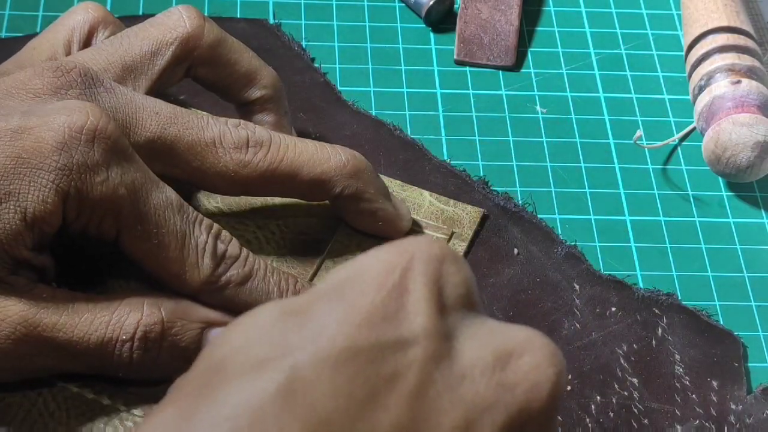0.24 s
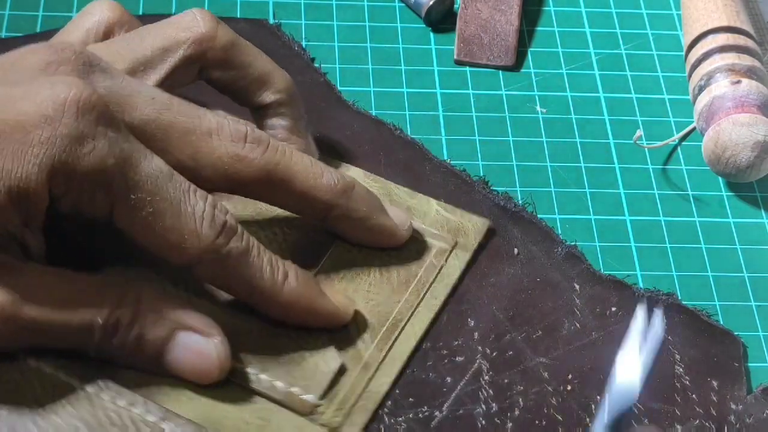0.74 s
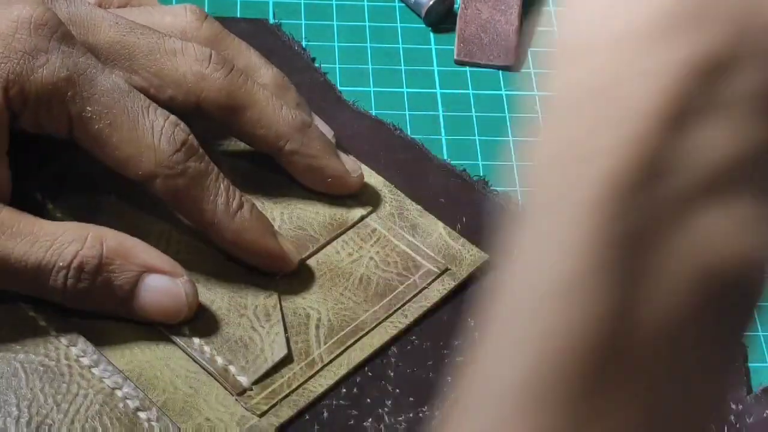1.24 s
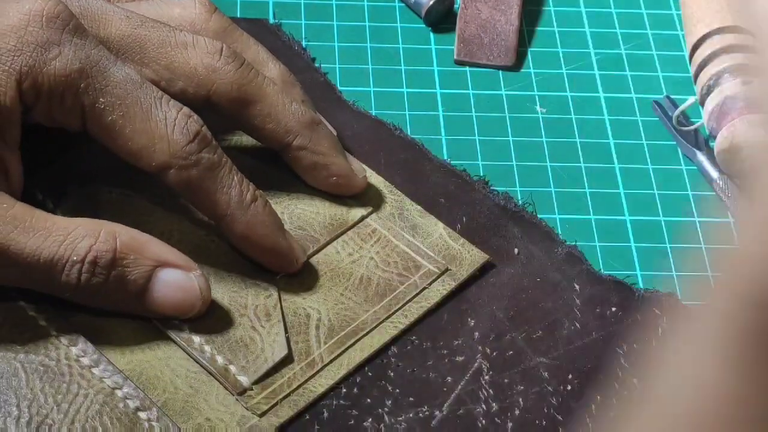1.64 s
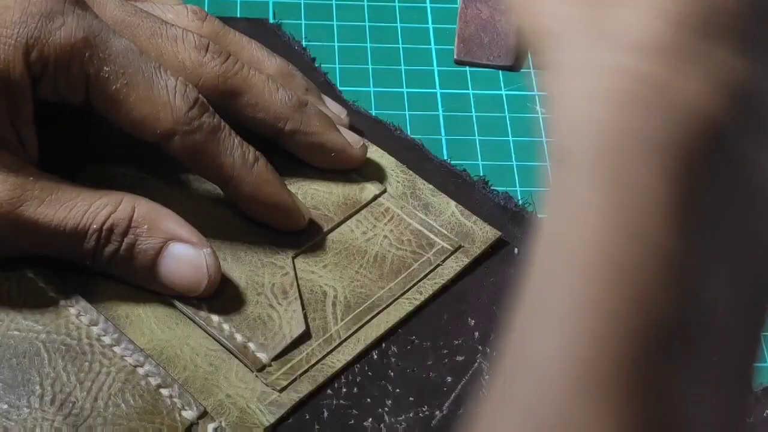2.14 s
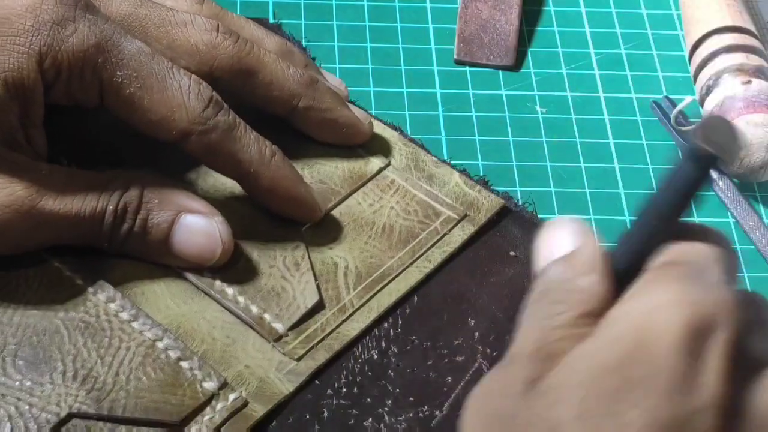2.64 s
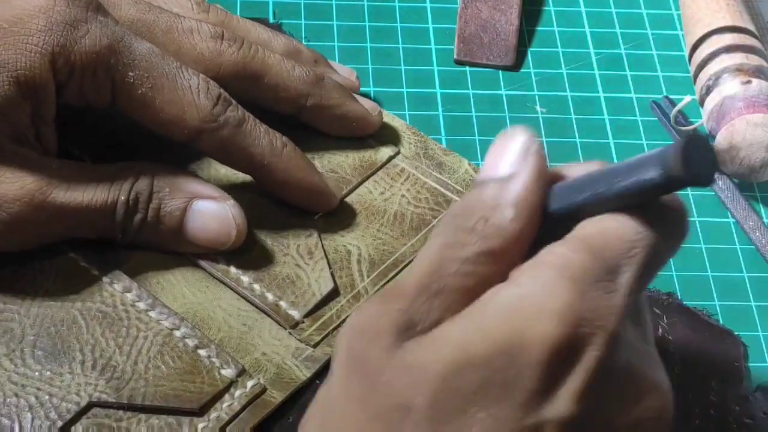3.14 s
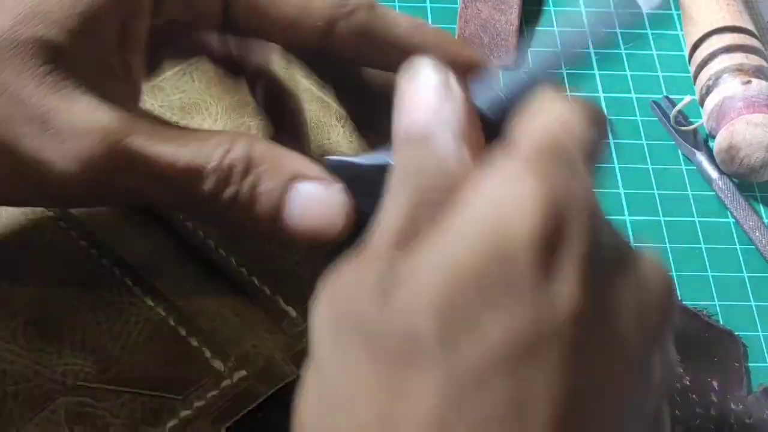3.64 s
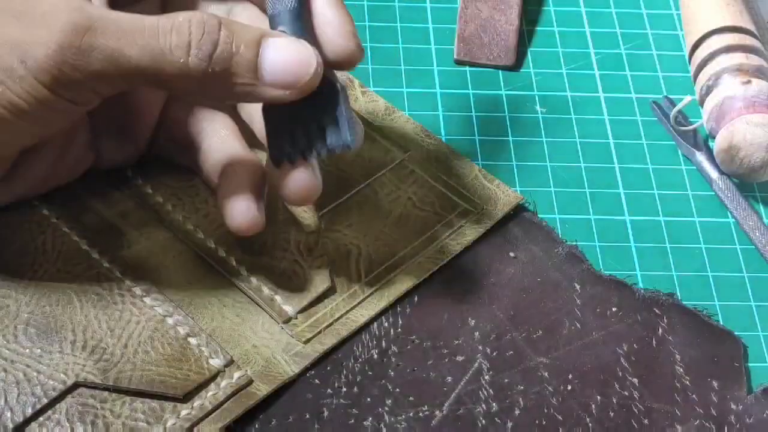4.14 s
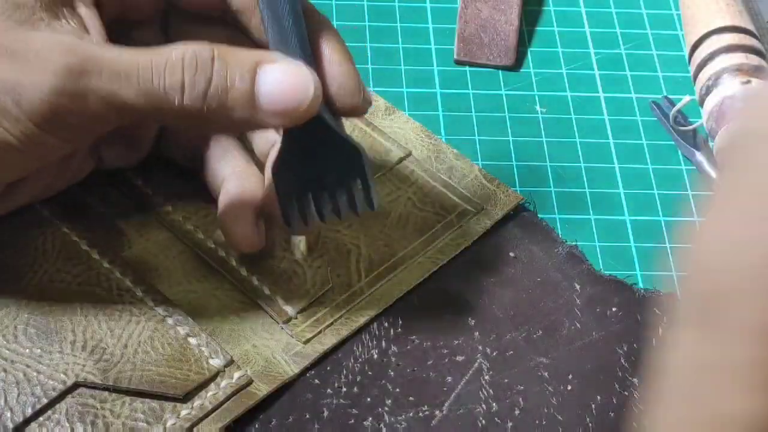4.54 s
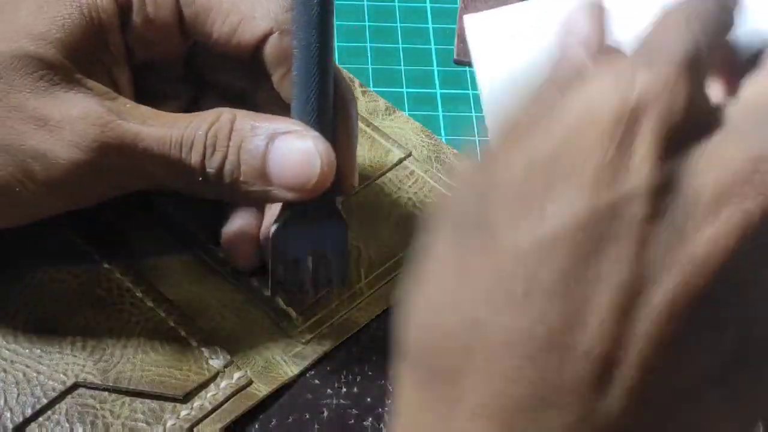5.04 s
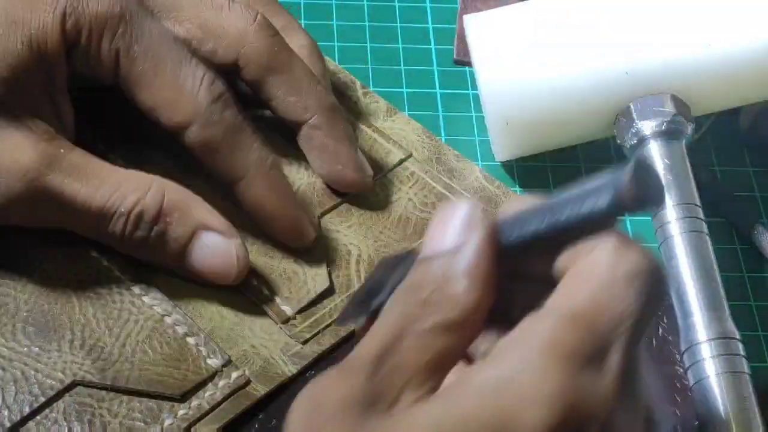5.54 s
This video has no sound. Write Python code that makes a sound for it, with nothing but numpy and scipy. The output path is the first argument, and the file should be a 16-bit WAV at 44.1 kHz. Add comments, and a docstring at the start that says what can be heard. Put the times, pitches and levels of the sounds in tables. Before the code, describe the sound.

A small, quiet room with soft low air noise and a very faint hum, heard close in stereo. At 0.74 s there is a faint dry tick, then a slight skin-on-leather brush around 0.9 s. At 1.18 s a light steel tool clacks sharply on the matted wooden table and bounces unevenly until about 1.46 s. From 2.0 to 2.1 s another steel tool lands in a tight, bright rattle. A duller, deep thud with a little metallic ring comes at 2.63 s, a softer thump at 3.01 s and a barely audible tap at 3.3 s. Tiny hollow knocks and ticks at 3.84 s mark a tool changing hands. Two short grainy drags at 4.35 and 4.45 s surround a piercing ringing clink at 4.43 s. The mallet lands with a hard knock at 4.87 s and a heavier, boomy one at 4.91 s, then clatters and ticks until 5.08 s. Quiet room air follows.

```python
"""Clacks, rattles, thuds and ringing clinks: hands set tools down on a wooden worktable with a cutting mat.
A steel divider bounces, a steel tool rattles, a wrist and a pricking iron thud, a nylon mallet is dragged
and lands. Each contact is a short push that snaps, excites fading sines for top, frame and tool, and adds
noise for crack and buzz. Rubbing, dry ticks and hissing tails are shaped noise. A phone with two ports
listens close by, in a small room with a quiet hum."""
import sys
import numpy as np
from scipy import signal
from scipy.fft import rfft, irfft
from scipy.io import wavfile
from scipy.ndimage import uniform_filter1d

SR = 44100
rng = np.random.default_rng(int(sys.argv[2]) if len(sys.argv) > 2 else 0)


def to_linear_factor(level_db):
    """Convert decibel levels (scalar or array-like) to linear amplitude factors."""
    exponent = np.asarray(level_db, float) / 20
    return 10 ** exponent


def log_audio(samples):
    """Write samples as a 16-bit WAV file to the path given in sys.argv[1]."""
    # one column per channel
    frames = np.atleast_2d(samples).T
    # limit to full scale, then quantise
    limited = np.clip(frames, -1, 1)
    pcm = np.round(limited * 32767).astype(np.int16)
    wavfile.write(sys.argv[1], SR, pcm)


N = 255294  # length of the scene in samples


def colour(x, points):
    """Shape the spectrum along (f/Hz, level/dB) points."""
    hz, db = np.transpose(points)
    f = np.fft.rfftfreq(x.shape[-1], 1 / SR) + 1
    gain_db = np.interp(np.log(f), np.log(hz), db)
    return irfft(rfft(x) * to_linear_factor(gain_db), x.shape[-1])


def band(x, lo_hz, hi_hz):
    """Keep mainly the sound between two frequencies."""
    edges = np.clip([lo_hz, hi_hz], 10, .45 * SR)
    return signal.sosfilt(signal.butter(2, edges, "band", fs=SR, output="sos"), x)


def unit(x):
    """Scale to rms 1."""
    return x / np.sqrt(np.mean(x ** 2))


def walk(rate):
    """Random levels, a new one rate times a second, with smooth slides between them; spread near 1."""
    k = int(SR / rate)
    steps = np.repeat(rng.standard_normal(N // k + 1), k)
    return unit(uniform_filter1d(steps, k)[:N])


def ports(mid, side, alike_hz):
    """Left and right are alike in the bass and differ more and more above alike_hz."""
    side = signal.sosfilt(signal.butter(1, alike_hz, "high", fs=SR, output="sos"), side)
    return np.array([mid + side, mid - side])


def rings(modes, t, gain_db=0):
    """A struck body rings as a sum of fading sines; t60 is the time to fall by 60 dB."""
    hz, db, t60 = np.transpose(modes)[..., None]
    sines = np.sin(2 * np.pi * hz * t)
    fade = np.exp(-np.log(1000) * t / t60)
    return np.sum(to_linear_factor(db + gain_db) * sines * fade, axis=-2)


def add(out, s, sound):
    """Mix a sound in at s seconds."""
    i = int(s * SR)
    out[:, i:i + sound.shape[-1]] += sound[..., :N - i]


def stroke_db(s, hold_s, rise_db_s, fall_db_s):
    """A rubbing movement gets louder, holds from s on and fades: dB under its full level."""
    t = np.arange(N) / SR
    return -rise_db_s * np.maximum(s - t, 0) - fall_db_s * np.maximum(t - s - hold_s, 0)


def patchy(x, lo_hz, hi_hz):
    """Half-octave bands whose levels flicker apart: each catches and lets go by itself."""
    edges = lo_hz * np.sqrt(2) ** np.arange(2 * np.log2(hi_hz / lo_hz))
    flicker_db = 1.5
    return unit(sum(to_linear_factor(flicker_db * walk(60)) * band(x, f, f * np.sqrt(2)) for f in edges))


def air_noise():
    """Steady air noise, shaped from white noise, with a slowly drifting level."""
    # colour of the air: (f/Hz, relative level/dB)
    air_colour = [(35, -49), (60, -18), (93, -4.5), (175, -6.5), (210, -6.5), (266, -11.5), (298, -9),
                  (351, -15.5), (376, -14.5), (497, -15), (773, -13), (1450, -23), (2360, -23),
                  (7900, -38.5), (15500, -38)]
    mid, side = colour(rng.standard_normal((2, N)), air_colour)
    loudness = np.std(band(mid, 67.0, 17000))
    level_db = -68 + 0.75 * walk(2.7)
    return to_linear_factor(level_db) * ports(mid, 1.18 * side, 700) / loudness


def hum():
    """Faint hum lines: sines whose level and phase waver."""
    # hum lines: (f/Hz, rms level before wavering/dB)
    hum_lines = [(204.6, -100), (296.1, -85), (387.6, -82.5), (597.5, -90.5), (760, -85), (877.5, -85.5)]
    t = np.arange(N) / SR
    out = 0
    for hz, db in hum_lines:
        level = np.sqrt(2) * to_linear_factor(db + 2. * walk(3.3))
        out = out + level * np.sin(2 * np.pi * hz * t + .5 * walk(8.5))
    return out


def table_sway():
    """The table sways as a low band of noise, and lurches in short low sines when a hand leans on it."""
    # lurches: (middle t/s, level/dB, f/Hz, time from the middle to 37 % of the swell/s)
    lurches = [(2.37, -47, 40, 0.039), (2.51, -56, 44.5, 0.063), (3.961, -54.5, 22.1, 0.16)]
    t = np.arange(N) / SR
    mid, side = band(band(rng.standard_normal((2, N)), 36, 75), 30, 95)
    both = mid + 0.29 * side * np.array([[1], [-1]])
    out = to_linear_factor(-65 - walk(2.927)) * both / np.std(mid)
    for s, db, hz, long in lurches:
        swell = np.exp(-((t - s) / long) ** 2)
        out = out + to_linear_factor(db) * swell * np.sin(2 * np.pi * hz * (t - s))
    return out


def room(dry):
    """A short diffuse tail: coloured noise that dies away, built up from uneven clumps of echoes."""
    # colour of the tail: (f/Hz, relative level/dB)
    tail_colour = [(60, -14), (120, -2), (800, -3.5), (2000, -5.5), (6000, -0.5), (12000, -16)]
    room_db, t60_s = -13, 0.45
    t = np.arange(int(.6 * SR)) / SR
    # the early echoes are uneven by 4 dB and even out over 60 ms
    clumps = to_linear_factor(4. * walk(500)[:len(t)] * np.exp(-t / .06))
    tail = colour(clumps * rng.standard_normal((2, len(t))), tail_colour)
    tail *= np.exp(-np.log(1000) * t / t60_s)
    tail *= 1 - np.exp(-t / .006)  # builds up over some 6 ms
    tail = ports(*tail, 540) / np.sqrt(np.sum(tail[0] ** 2))
    source = dry.mean(axis=0)[None]
    return to_linear_factor(room_db) * signal.fftconvolve(source, tail, axes=1)[:, :N]


def brush():
    """Skin and sleeve brushing leather: a soft treble hiss of uneven noise."""
    # brushes: (full level at t/s, level/dB, rise/(dB/s), fall/(dB/s))
    brushes = [(.9, -71.5, 500, 116), (3.775, -76.5, 120, 250), (3.858, -74, 300, 300),
               (5.05, -65, 400, 127)]
    hiss = to_linear_factor(3.7 * walk(100)) * band(rng.standard_normal((2, N)), 1700, 7500)
    return unit(hiss) * sum(to_linear_factor(db + stroke_db(s, 0, rise, fall)) for s, db, rise, fall in brushes)


def drag():
    """Nylon mallet catching on the grain of the mat: noise in uneven slips, lows through the table."""
    # two strokes: (full speed at t/s, level/dB, hold/s, rise/(dB/s), fall/(dB/s))
    strokes = [(4.359, -51, 0.011, 244, 148), (4.451, -51.5, 0.034, 900, 240)]
    # colour of the rubbing: (f/Hz, relative level/dB)
    drag_colour = [(88, -40), (150, 0), (279, 2), (346, -6.5), (550, 6.5), (618, -6), (930, 7.5),
                   (1020, -3), (1290, 5), (1900, -1.5), (2500, -8), (3280, -8), (3760, -7.5), (5200, -13),
                   (6300, -14.5), (8300, -5.5), (10900, -7), (15500, -25)]
    # per stroke: how much earlier the hiss reaches full level than the table answers (lead/s)
    treble_lead = (0.018, 0.003)
    treble_db = (-7, 0)  # treble against the body, per stroke
    treble_per_db = 1.43  # the treble fades faster as the head slows
    slips = to_linear_factor(.6 * walk(90) + 3. * walk(900)) * rng.standard_normal((2, N))
    grain = colour(slips, drag_colour)
    low = patchy(grain, 131.4, 4800)
    high = patchy(grain, 2590, 13000)
    body = ports(*low, 1200)
    hiss = high[0] + high[1] * np.array([[1], [-1]])
    out = 0
    for (s, db, *shape), extra_db, lead in zip(strokes, treble_db, treble_lead):
        body_db = db + stroke_db(s, *shape)
        hiss_db = db + extra_db + treble_per_db * stroke_db(s - lead, *shape)
        out = out + to_linear_factor(body_db) * body + to_linear_factor(hiss_db) * hiss
    return out


def knuckle(db, hz, t60):
    """A small hollow knock as the iron changes hands: one fading sine, stronger on the right."""
    t = np.arange(int(.1 * SR)) / SR
    return rings([(hz, db, t60)], t) * np.array([[.7], [1.3]])


def noise_burst(db, hz, width_hz, fade_ms):
    """A burst of band noise that fades: a dry tick, a clink's splash or a hissing tail of a ring."""
    t = np.arange(int(.3 * SR)) / SR
    burst = band(rng.standard_normal((2, len(t))), hz - width_hz / 2, hz + width_hz / 2)
    return to_linear_factor(db) * unit(burst) * np.exp(-t / fade_ms * 1e3) / 2


def contact(tool, snap_db, contact_ms, boom_db, ring_db, damping):
    """One push on the table: snap, top, frame and tool, starting 3 ms before its peak."""
    # what each tool rings with: (f/Hz, relative level/dB, t60 when not muffled/s)
    tool_modes = np.array({"divider": [(3120, -3, .03), (4380, 0, 0.025), (8387, -7, 0.083),
                           (11150, -9.5, 0.098), (14920, -11, .09)], "steel": [(5080, -12, .15),
                           (8000, -20, .15), (8400, -12, 0.17), (8620, -2.5, 0.023), (12260, -20, .015)],
                           "iron": [(5500, -16, 0.21), (5836, -1, 0.15), (7050, 2, .02), (9200, -6, 0.033),
                           (10270, -14.5, 0.024), (13900, -17, .03)], "mallet": [(550, 6, 0.07),
                           (870, 1, 0.07), (2015, 0, 0.15), (3200, -9.5, 0.052), (3900, 1, 0.032),
                           (3980, -22, 0.17), (5970, -25, .07), (7230, -26, .09)]}[tool])
    # how each tool meets the mat: (extra drive into the top/dB, chatter depth/0-1, buzz against ring/dB)
    touch = {"divider": (2.7, 0.38, 1.4), "steel": (0.19, 0.9, -9.5), "iron": (0.3, 0.22, -15.5),
             "mallet": (1, 0.66, -12.5)}
    # share of the press that springs back, per tool (share/0-1)
    rebound = {"divider": .75, "steel": .5, "iron": .65, "mallet": .4}
    # where each tool lies: how much later the right port hears its push (lag/us)
    lag_us = {"divider": 65, "steel": -76, "iron": 96, "mallet": 58}
    # table top: (f/Hz, relative level/dB, t60/s)
    top_modes = [(444, 2, 0.0078), (940, -11, 0.022), (1500, -6, 0.022), (275.6, -2.5, 0.18),
                 (417.8, -15, 0.3), (498.6, -4.5, 0.12), (566.5, -1, 0.12), (613, -3, 0.16),
                 (700, -5, 0.085), (878, -3.5, 0.076), (990, 6, 0.033), (1095, -2, 0.061),
                 (1318, -13, 0.088), (1250, -27, 0.073), (1390, -32, 0.074), (1660, -10.5, 0.06),
                 (1884, -1.5, 0.056), (2240, -12, 0.03), (2700, -1, 0.03)]
    # table frame: (f/Hz, relative level/dB, t60/s)
    frame_modes = [(71.7, -10.5, 0.33), (90, 0, 0.19), (109.2, 8.5, 0.11), (121, -3.5, 0.15),
                   (156.2, -5.5, 0.11), (183.2, -10.5, 0.19)]

    t = np.arange(int(.45 * SR)) / SR
    late = np.array([[-.5], [.5]]) * lag_us[tool] * 1e-6
    drive_db, loose, buzz_db = touch[tool]
    phase = (t[:500] - .003 - late) / (contact_ms * 1e-3)
    # the mat is pressed in, then springs back a little slower
    press = np.cos(np.pi * np.clip(phase, -.5, .5)) ** 2
    release = np.cos(np.pi * np.clip((phase - .8) / 1.2, -.5, .5)) ** 2
    push = press - rebound[tool] * release

    # each spot drives the modes differently, and each port hears them a little differently
    spot_db = 4. * rng.uniform(-1, 1, (len(top_modes), 1))
    spot_db = spot_db + 2. * rng.uniform(-1, 1, (2, len(top_modes), 1))
    # the top is driven away from the phone: suction first
    top = -to_linear_factor(-48 + drive_db) * rings(top_modes, t, spot_db)
    top[:, 0] -= 1  # the snap: the push itself
    sound = to_linear_factor(snap_db) * signal.fftconvolve(top, push, axes=1)[:, :len(t)]

    after = np.maximum(t - .003, 0)
    # the heavy frame takes a few ms to get going
    slow = np.maximum(after - .0012, 0)
    frame_db = rng.uniform(-2.4, 2.4, (len(frame_modes), 1))
    boom = rings(frame_modes, slow, frame_db) * (1 - np.exp(-slow / 0.0021))
    sound += to_linear_factor(boom_db) * boom / np.abs(boom).max() * np.array([[1.07], [.93]])

    # the harder and shorter the contact, the louder its crack, which fades to 37 % in 1 ms
    grit = band(rng.standard_normal((2, len(t))), 1000, 6200) * (after > 0)
    sound += to_linear_factor(1.74 * snap_db - 19) * grit * np.exp(-after / .001) / contact_ms ** 2
    # loose parts buzz on for a moment
    sound += to_linear_factor(ring_db + buzz_db) * grit * np.exp(-after / .024)

    # a tool lying loose on the mat chatters, which roughens its ring
    chatter = 1 + loose * unit(band(rng.standard_normal((2, len(t))), 63, 202))
    tool_db = rng.uniform(-5, 3, (len(tool_modes), 1))
    tool_db = tool_db + rng.uniform(-2, 2, (2, len(tool_modes), 1))
    ring = rings(tool_modes / [1, 1, damping], after, tool_db)
    return sound + to_linear_factor(ring_db) * chatter * ring / 2


def scene():
    """Contacts, noise bursts, knocks and rubbing in the room, over air noise, hum and table sway."""
    # contacts per tool: (t/s, snap level/dB, contact length/ms, frame boom level/dB, tool ring drive/dB)
    contacts = { "divider": [(1.1769, -21.5, 0.45, -38.5, -53.5), (1.1797, -34.5, 0.76, -72, -75),
                (1.1872, -43, 0.24, -70, -61), (1.2008, -41.5, 1.65, -57, -68),
                (1.2325, -27, 0.36, -73, -59.5), (1.2575, -37, 0.55, -48, -72),
                (1.2635, -46, 0.88, -69, -77), (1.2855, -23.5, 0.41, -50, -55),
                (1.3253, -30, 0.41, -45, -62), (1.3336, -36.5, 0.7, -66, -62.5),
                (1.3967, -32.5, 0.38, -50, -58.5), (1.4024, -38.5, 0.61, -77, -66),
                (1.414, -42, 1.2, -58, -67), (1.4635, -61, 0.66, -50, -73)],
                "steel": [(2.002, -56, 15, -32, -76), (2.0133, -20, 0.47, -40, -45),
                (2.023, -47, 0.37, -36, -53), (2.0351, -27.5, 0.46, -40, -56),
                (2.0445, -32.5, 4.4, -55, -71), (2.057, -26, 0.5, -64, -45),
                (2.0604, -30.5, 0.54, -48, -48), (2.0675, -37, 0.3, -40, -53),
                (2.0975, -33.5, 0.52, -47, -50.5)], "iron": [(.7381, -47.5, 1.28, -44, -88),
                (2.6276, -26, 1.6, -25.5, -54), (2.634, -35, 0.89, -58, -64), (2.6505, -45, 0.69, -42, -71),
                (3.0119, -32, 1.71, -29.5, -71), (3.0181, -37, 0.51, -71, -60),
                (3.298, -53.5, 1.2, -57.5, -79), (4.28, -58, 1.7, -49.5, -82),
                (4.4253, -25, 0.45, -35.5, -28), (4.4272, -32.5, 0.63, -58, -37.5),
                (4.4297, -26, 0.52, -47, -28)], "mallet": [(4.8668, -19.5, 0.58, -33, -37),
                (4.8947, -41, 0.69, -42, -73), (4.9075, -13.5, 0.45, -26, -32.5),
                (4.9151, -22.5, 0.41, -35, -75), (4.918, -26, 5, -30, -80), (4.951, -38, 0.14, -48, -75),
                (4.9813, -31.5, 0.4, -63, -66), (4.986, -44, 3, -35, -80), (5.0011, -36, 0.76, -36.5, -69),
                (5.0365, -41, 0.5, -58, -67), (5.0395, -39.5, 0.64, -37, -67),
                (5.049, -38.5, 4.2, -52, -79)]}
    # ticks, splashes and hissing tails: (t/s, drive/dB, centre f/Hz, width/Hz, fade to 37 %/ms)
    bursts = [(0.736, -53.5, 2410, 3900, 2.9), (2.0133, -41, 11900, 6000, 1.5),
              (2.056, -58, 12000, 6000, 8), (2.63, -43.5, 1470, 1630, 12.7),
              (2.6308, -47.5, 9200, 9700, 15), (2.639, -58.5, 5900, 1200, 46), (3.01, -53, 1870, 1500, 12),
              (3.832, -49, 2770, 1500, 3.1), (3.8475, -39, 6560, 5850, 0.61), (4.426, -26, 8600, 8260, 4.6),
              (4.91, -47, 5200, 6940, 42), (5.0397, -44, 8800, 9100, 2.6), (5.05, -47, 8600, 10200, 6.2),
              (5.079, -41, 9600, 10000, 1.4)]
    # hollow knocks: (t/s, drive/dB, f/Hz, t60/s)
    knuckles = [(3.84, -47, 835, 0.017), (3.849, -49.5, 515, 0.063), (3.866, -56.5, 690, 0.049)]
    # fingers hold the iron, the mallet lies on the mat: from s, to s their rings die 7 times faster
    muffled_s, muffle = {"iron": (2.9, 4.8), "mallet": (4.9, 5.8)}, 7.
    dry = drag() + brush()
    for tool, rows in contacts.items():
        start, end = muffled_s.get(tool, (0, 0))
        for s, *how in rows:
            damping = muffle if start < s < end else 1
            add(dry, s - .003, contact(tool, *how, damping))
    for s, *how in bursts:
        add(dry, s, noise_burst(*how))
    for s, *how in knuckles:
        add(dry, s, knuckle(*how))
    return dry + room(dry) + air_noise() + hum() + table_sway()


def roll_off(x):
    """The treble ends steeply here."""
    return signal.sosfilt(signal.butter(12, 16480, fs=SR, output="sos"), x)


def record(dry):
    """The very top is cut steeply above 15.6 kHz."""
    mix = signal.sosfilt(signal.butter(14, 15600, fs=SR, output="sos"), dry)
    return roll_off(mix)


dry = scene()
out = record(dry)
log_audio(out)
```